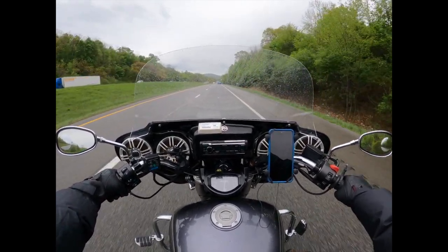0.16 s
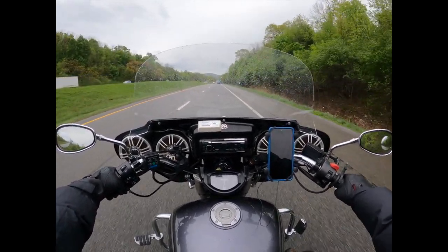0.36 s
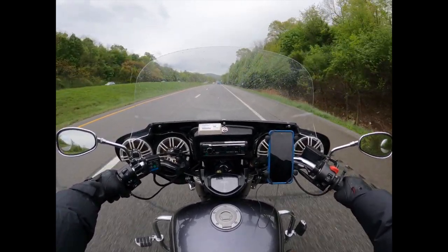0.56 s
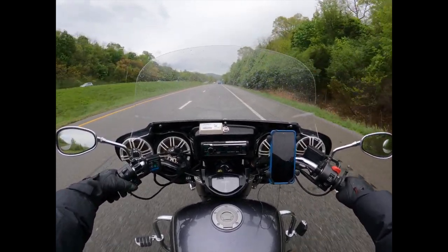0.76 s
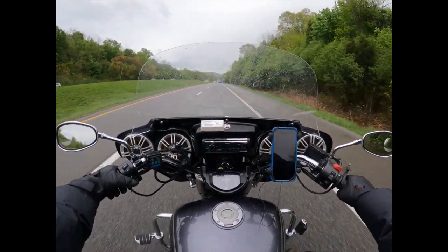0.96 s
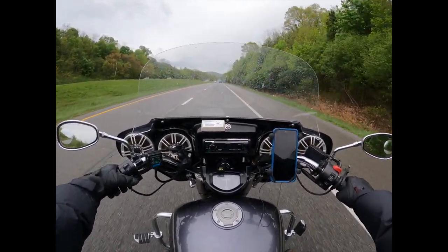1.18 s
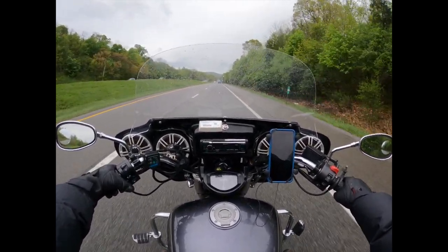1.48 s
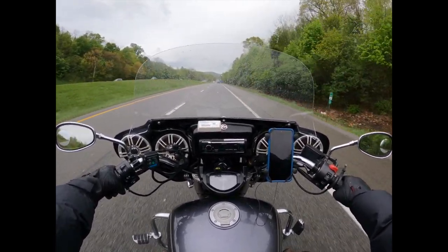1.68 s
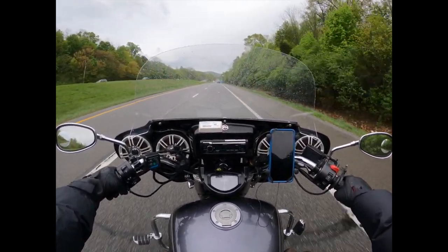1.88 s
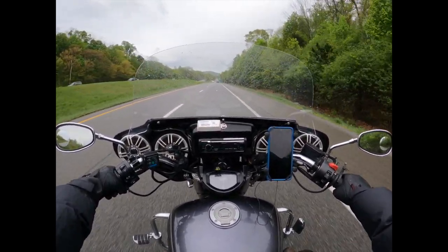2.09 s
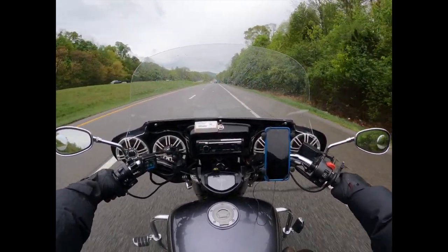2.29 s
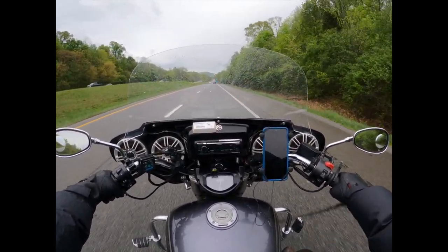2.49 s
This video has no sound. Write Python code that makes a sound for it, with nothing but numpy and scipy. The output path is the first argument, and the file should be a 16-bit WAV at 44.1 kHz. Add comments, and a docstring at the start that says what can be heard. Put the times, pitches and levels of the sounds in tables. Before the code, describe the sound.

Wind buffets a rider's microphone heavily over the steady low drone of a cruising motorcycle engine

```python
"""Turbulent air behind a windshield buffets a microphone on the chest of a motorcycle rider on a highway.
The wind is shaped noise: deep buffets, flapping, and a rush and hiss that swell in gusts; slaps are pulses.
Under it the V-twin, at a nearly steady speed, adds a drone of exhaust tones, repeating clatter and a whine.
Steady noise makes the tyres, and short bursts make small ticks near the camera.
The camera's limiter holds down the biggest peaks; the sound is mono."""
import sys
import numpy as np
from scipy.fft import rfft, irfft, next_fast_len
from scipy.io import wavfile
from scipy.ndimage import uniform_filter1d, minimum_filter1d, map_coordinates

SR = 44100
rng = np.random.default_rng(int(sys.argv[2]) if len(sys.argv) > 2 else 0)


def inscribe(sig):
    """Save sig as 16-bit PCM at rate SR to the path in sys.argv[1].

    A 1-D sig is mono; a 2-D sig holds one channel per row.
    Samples are clipped to [-1, 1] before scaling.
    """
    pcm = np.round(np.clip(np.atleast_2d(sig).T, -1, 1) * 32767)
    wavfile.write(sys.argv[1], SR, pcm.astype(np.int16))


N = 116865  # length in samples


def amp(db):
    """Turn decibels into a gain."""
    return 10 ** (np.asarray(db) / 20)


def unit(x):
    """Scale x to an rms level of 1."""
    return x / np.sqrt(np.mean(x ** 2) + 1e-20)


def along(points, hz):
    """Read a table of (Hz, value) points at any frequency, on a log frequency axis."""
    f, v = np.transpose(points)
    return np.interp(np.log(hz + 1), np.log(f + 1), v)


def curve(rows):
    """Join (seconds, value) rows with straight lines, giving one value per sample."""
    return np.interp(np.arange(N) / SR, *np.transpose(rows))


def wobble(rate):
    """Draw a smooth random curve through `rate` random points a second."""
    points = rng.standard_normal(N // 20)
    return map_coordinates(points, [np.arange(N) * rate / SR], mode="wrap")


def filtered(x, response):
    """Multiply the spectrum of x by a gain that depends on frequency."""
    m = next_fast_len(N + SR // 2)  # spare room so the end does not wrap onto the start
    hz = np.fft.rfftfreq(m, 1 / SR)
    return irfft(rfft(x, m) * response(hz), m)[:N]


def coloured(x, spectrum):
    """Shape x with a spectrum table, then scale it to rms 1."""
    return unit(filtered(x, lambda hz: amp(along(spectrum, hz))))


def noise(spectrum):
    """Make random noise of rms 1 with the given spectrum."""
    return coloured(rng.standard_normal(N), spectrum)


# Colour of the tyre noise. Each row: frequency in Hz, relative level in dB per Hz.
TYRES = [(100, -4), (400, -2), (1000, -4.5), (1700, -18.5), (3000, -34), (8000, -25), (16000, -50)]
TYRES_DB = -47.5


def tyres():
    """Tyres on the road make a steady noise, strongest at low frequencies."""
    return amp(TYRES_DB) * noise(TYRES)


# Small sharp ticks and a rattle near the camera.
# Each row: start in seconds, starting level in dB, centre in Hz, time to fall by 60 dB in seconds.
TICKS = [(1.188, -41, 7660, 0.0075), (1.634, -43, 7540, 0.014), (1.972, -30.5, 2230, 0.035),
         (2.186, -37, 2140, .04), (2.587, -41, 5400, 0.013)]
TICK_WIDTH = 0.098  # spread of the band, in octaves


def ticks():
    """A small tick is a burst of noise in a narrow band that starts at once and dies fast."""
    out = np.zeros(N)
    for start, db, centre, t60 in TICKS:
        t = np.arange(N) / SR - start

        def band_gain(hz):
            octaves_away = np.log2((hz + 1) / centre)
            return np.exp(-.5 * (octaves_away / TICK_WIDTH) ** 2)

        band = unit(filtered(rng.standard_normal(N), band_gain))
        out += (t >= 0) * amp(db - 60 * np.abs(t) / t60) * band
    return out


# Tones of the exhaust. Each row: multiple of the engine's cycle rate, relative level in dB.
EXHAUST = [(2, 0.5), (3, -3.5), (4, -13.5), (5, -1), (6, -9), (7, -8), (8, -16.5), (10, -17), (11, -17.5),
           (12, -23.5), (13, -30), (14, -29), (16, -28.5)]
EXHAUST_DB, EXHAUST_WAVER_DB = -17.5, 1.5
EXHAUST_SMEAR = 0.82  # radians by which the pipes scatter the tones of each pulse


def exhaust(cycle):
    """Exhaust pulses repeat with the engine cycle, so they add up to tones at multiples of its rate."""
    drone = np.zeros(N)
    for multiple, db in EXHAUST:
        level = amp(db + EXHAUST_WAVER_DB * wobble(6))
        phase = EXHAUST_SMEAR * rng.standard_normal()
        drone += level * np.cos(2 * np.pi * multiple * cycle + phase)
    return amp(EXHAUST_DB) * unit(drone)


# Colour of the engine's clatter. Each row: frequency in Hz, relative level in dB per Hz.
CLATTER = [(200, -30), (450, -3.5), (800, -7.5), (1200, -1), (1700, -8), (2000, -12.5), (2400, -13),
           (3200, -49), (8000, -56)]
CLATTER_DB = -45.5
CLATTER_PULSING = 0.54  # depth of the swelling, as a share of the average strength


def clatter(cycle):
    """Moving parts knock in the same random pattern every cycle, swelling twice in each."""
    pattern = rng.standard_normal(1024)
    knocks = map_coordinates(pattern, [cycle % 1 * len(pattern)], mode="wrap")
    swelling = 1 + CLATTER_PULSING * np.cos(4 * np.pi * cycle)
    return amp(CLATTER_DB) * coloured(knocks * swelling, CLATTER)


# Whine of the engine and drive. Each row: frequency in Hz at the average speed, relative level in dB.
WHINE = [(823, -51), (1182, -51), (1515, -49.5), (1568, -60), (1646, -59), (1721, -55.5), (2390, -59.5)]
WHINE_DB, WHINE_WAVER_DB = -2.5, 0.5


def whine(cycle, mean_speed):
    """Turning gears sing at pitches that follow the engine speed and waver a little."""
    out = np.zeros(N)
    for hz, db in WHINE:
        level = amp(db + WHINE_WAVER_DB * wobble(6.77))
        phase = 0.79 * wobble(10) + 2 * np.pi * rng.random()
        out += level * np.sin(2 * np.pi * hz * cycle / mean_speed + phase)
    return amp(WHINE_DB) * out


# Engine speed. Each row: time in seconds, four-stroke cycles per second.
SPEED = [(0, 25.3), (.9, 25.75), (1.8, 25.75), (2.65, 26.5)]


def engine():
    """One running count of engine cycles drives exhaust, clatter and whine together."""
    speed = curve(SPEED)
    cycle = np.cumsum(speed) / SR
    return exhaust(cycle) + clatter(cycle) + whine(cycle, speed.mean())


# Single hard slaps of air. Each row: centre time in seconds, peak level in dB, centre frequency in Hz.
SLAPS = [(2.058, -12, 180), (2.5, -12, 363)]


def slaps():
    """A slap of air is one short push of pressure between two shallower troughs."""
    t = np.arange(N) / SR
    out = np.zeros(N)
    for s, db, hz in SLAPS:
        u = (np.pi * hz * (t - s)) ** 2
        out += amp(db) * (1 - 2 * u) * np.exp(-u)
    return out


# Strength of the airflow at the microphone; only the ups and downs around its average count.
# Each row: time in seconds, level in dB.
GUST = [(0.02, -42), (0.08, -43.5), (0.2, -40), (0.24, -48.5), (0.4, -40.5), (0.44, -41), (0.55, -42.5),
        (0.59, -40.5), (0.68, -39.5), (0.76, -43), (0.78, -40.3), (0.84, -45.5), (0.92, -43), (1.06, -38.5),
        (1.1, -42), (1.22, -43.1), (1.26, -39.5), (1.34, -43), (1.44, -38.5), (1.52, -44), (1.6, -40.5),
        (1.66, -39.5), (1.74, -40.5), (1.8, -39.6), (1.82, -44), (1.88, -43), (1.92, -41.5), (1.98, -38.5),
        (2.0, -41.5), (2.15, -42.5), (2.19, -40.2), (2.24, -41.5), (2.28, -45.5), (2.34, -41.5), (2.4, -44),
        (2.46, -39.5), (2.54, -45), (2.62, -41)]
# Level of the deep buffeting. Each row: time in seconds, level in dB.
BUFFET_LEVEL = [(0.02, -11), (0.04, -11.5), (0.18, -9.5), (0.3, -19.5), (0.38, -10.0), (0.72, -12),
                (0.76, -12), (0.86, -15.5), (0.92, -6), (1.04, -12.5), (1.38, -12), (1.52, -9.5),
                (1.58, -12.5), (1.7, -5), (1.78, -13), (1.82, -9), (1.88, -16.5), (2.0, -7.5), (2.12, -13),
                (2.2, -7), (2.28, -12.5), (2.36, -10), (2.6, -12.5), (2.62, -8)]
# Level of the higher, flapping part. Each row: time in seconds, level in dB.
FLAP_LEVEL = [(0.02, -25), (0.12, -18.5), (0.2, -14.5), (0.24, -29), (0.44, -15), (0.5, -23), (0.6, -16.5),
              (0.84, -23), (1.06, -17.5), (1.14, -22), (1.3, -18.5), (1.34, -22.5), (1.6, -19), (1.7, -18),
              (2.02, -22), (2.06, -14.5), (2.12, -22.5), (2.2, -18), (2.28, -25), (2.32, -17),
              (2.36, -24.5), (2.48, -13), (2.54, -29.5), (2.62, -16.5)]
# Colours of the four parts of the wind. Each row: frequency in Hz, relative level in dB per Hz.
BUFFET = [(4, -13), (12, -10.5), (22, -1), (45, -0.5), (80, -8.5), (105, -11.5), (150, -17), (250, -38),
          (500, -51.5), (2000, -100)]
FLAP = [(40, -28), (100, -4.5), (150, 1.5), (200, -1), (270, -7.5), (350, -12.5), (500, -25.5), (900, -43),
        (2000, -88)]
RUSH = [(100, -26), (300, 7), (550, 0), (900, 0), (1300, -2.5), (1700, -2.5), (2000, -10.5), (2400, -13),
        (3000, -17), (5000, -40), (10000, -60)]
HISS = [(1000, -2), (2500, 5.5), (3050, -2), (3400, 5), (4000, 0.5), (5500, -0.5), (7100, -5), (8100, -0.5),
        (8700, -5.5), (10300, -7), (13000, -15), (15700, -20)]
BUFFET_DB, FLAP_DB, RUSH_DB, HISS_DB = 0.9, -1.16, -37, -49.5
RUSH_GROWS, HISS_GROWS = 1.64, 1.24  # dB per dB of gust
EDDY_PER_S = 90  # random points a second in the fast flutter of the airflow
FLAP_FLUTTER_DB, RUSH_FLUTTER_DB, HISS_FLUTTER_DB = 2, 1.95, 0.73 * 1.95


def wind():
    """Turbulent air pushes deep and slow, flaps above that, and rushes and hisses with gusts and eddies."""
    gust_db = curve(GUST)
    gust_db = gust_db - gust_db.mean()
    eddies = wobble(EDDY_PER_S)  # shared by flap, rush and hiss

    buffet_db = BUFFET_DB + curve(BUFFET_LEVEL)
    flap_db = FLAP_DB + curve(FLAP_LEVEL) + FLAP_FLUTTER_DB * eddies
    # rush and hiss each have a still faster flutter of their own
    rush_db = RUSH_DB + RUSH_GROWS * gust_db + RUSH_FLUTTER_DB * eddies + 2.3 * wobble(200)
    hiss_db = HISS_DB + HISS_GROWS * gust_db + HISS_FLUTTER_DB * eddies + 1.2 * wobble(250)

    buffet = amp(buffet_db) * noise(BUFFET)
    flap = amp(flap_db) * noise(FLAP)
    rush = amp(rush_db) * noise(RUSH)
    hiss = amp(hiss_db) * noise(HISS)
    return buffet + flap + rush + hiss


def scene():
    """Add up all the sources, the same in both channels."""
    mono = tyres() + ticks() + engine() + slaps() + wind()
    return np.array([mono, mono])


DRIVE_DB, CEILING = 0.7, 0.83  # gain into the limiter; peak size above which it acts
LOOK_AHEAD_S, HOLD_S = 0.0035, 0.0021
TOP_HZ = 15720  # nothing is kept from here up


def record(dry):
    """The camera's limiter turns down just before each big peak; then the highest treble is cut off."""
    x = amp(DRIVE_DB) * dry
    ahead = max(int(LOOK_AHEAD_S * SR), 2)
    hold = max(int(HOLD_S * SR), 1)
    needed = CEILING / np.maximum(np.abs(x).max(axis=0), CEILING)
    lowest = minimum_filter1d(needed, ahead + hold)
    # two averages in a row round off the gain changes
    gain = uniform_filter1d(uniform_filter1d(lowest, ahead), ahead)
    return np.array([filtered(side * gain, lambda hz: hz < TOP_HZ) for side in x])


dry = scene()
out = record(dry)
inscribe(out)
```